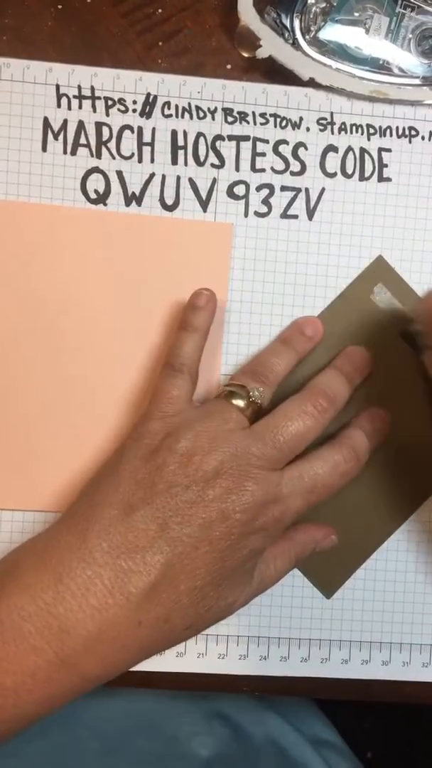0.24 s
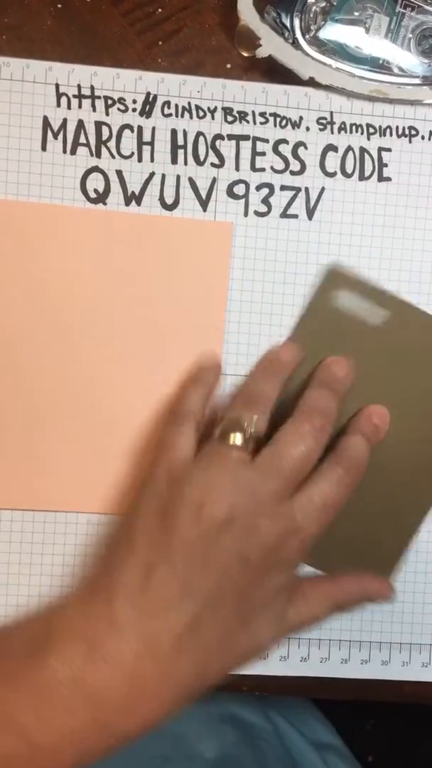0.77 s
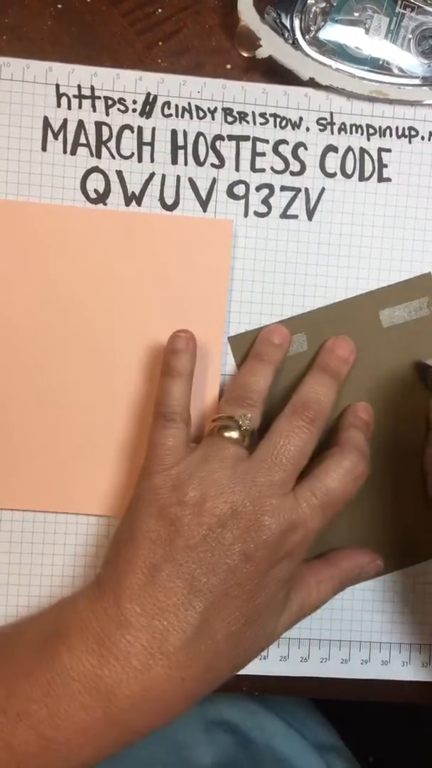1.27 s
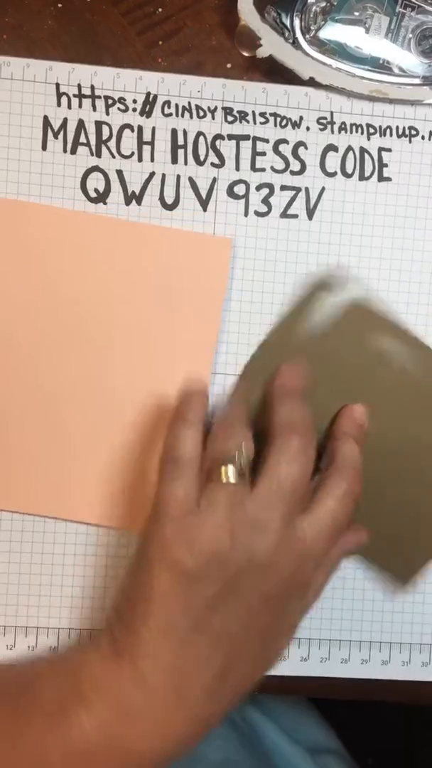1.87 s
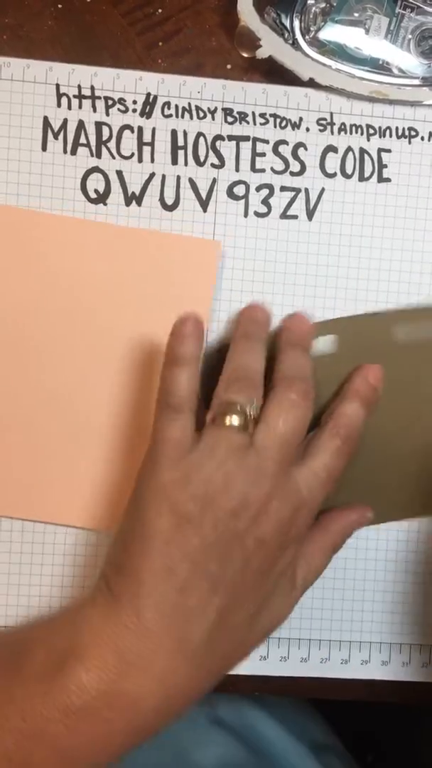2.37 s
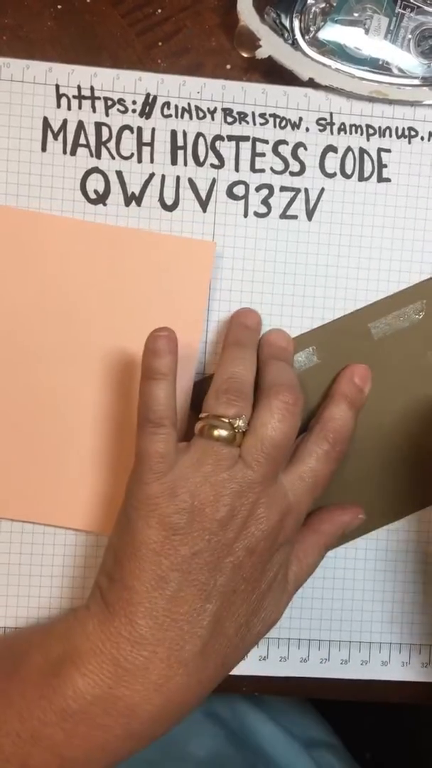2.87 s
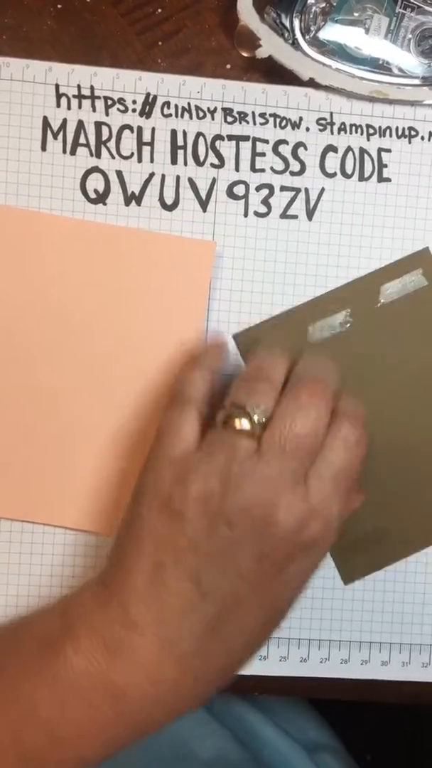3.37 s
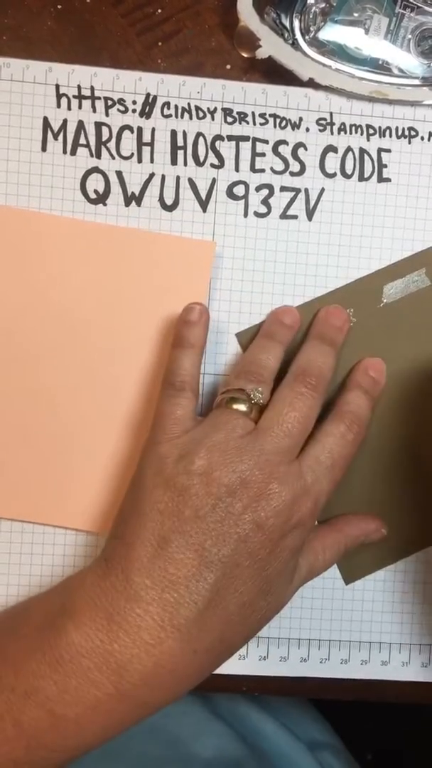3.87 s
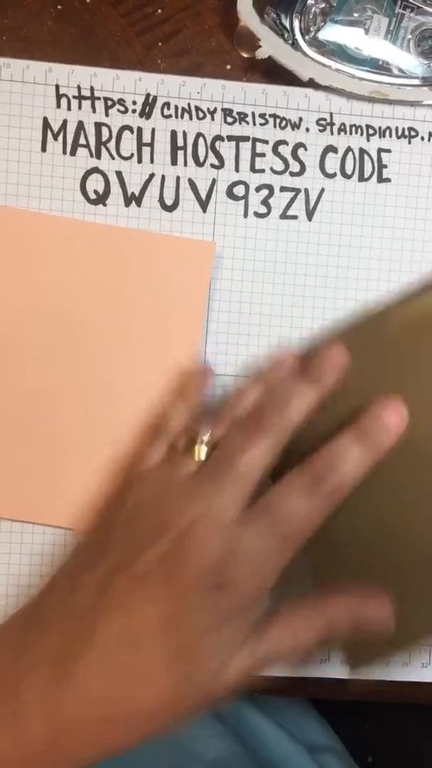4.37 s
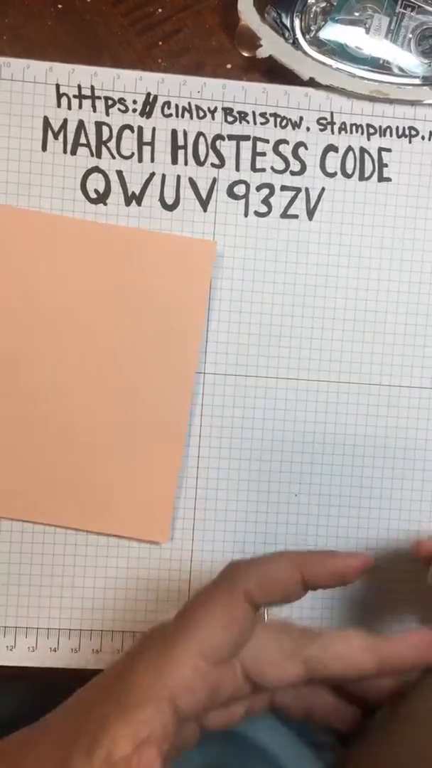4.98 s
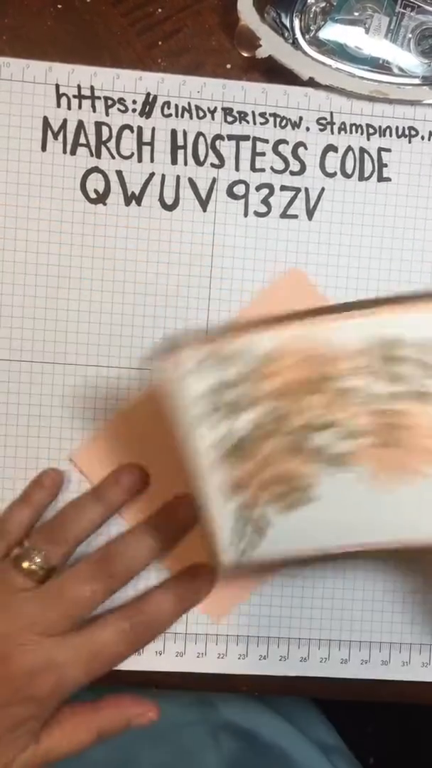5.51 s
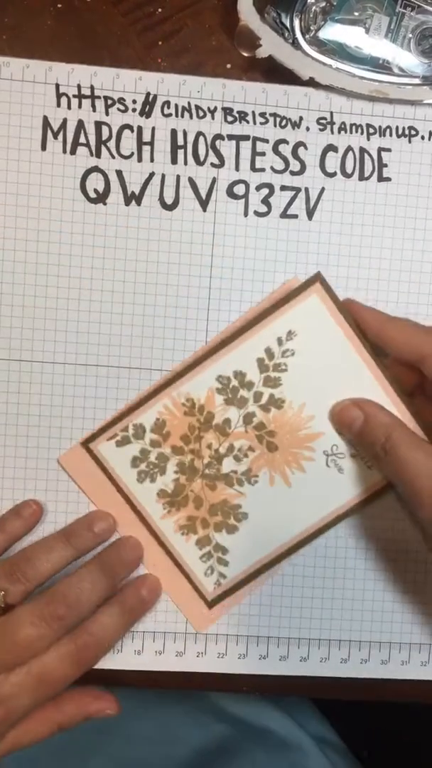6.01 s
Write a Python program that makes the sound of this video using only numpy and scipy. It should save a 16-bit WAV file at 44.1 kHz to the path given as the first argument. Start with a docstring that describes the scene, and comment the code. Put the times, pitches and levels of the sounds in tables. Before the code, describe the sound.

A plastic tape runner is drawn across cardstock in eight short strokes, mostly in pairs, each a quick ratcheting zip with a fine sticky crackle. Between them the card is turned and tapped on a desk pad. The runner then clatters down and rocks briefly, something knocks on the desk, and card slides softly into place. It is all close to the microphone in a small, quiet room.

```python
"""A plastic tape runner is drawn over cardstock in eight short strokes, close to one microphone at a
craft desk in a small room. Its pawl snaps off some 75 teeth a second and rings the hollow case while
the glue crackles off the tape; between strokes a hand turns and taps the card on the desk pad.
Then the runner is put down and rocks, something knocks on the desk, and the card slides into place."""
import sys
import numpy as np
from scipy import signal
from scipy.fft import rfft, irfft
from scipy.io import wavfile
from scipy.ndimage import uniform_filter1d

SR = 44100
rng = np.random.default_rng(int(sys.argv[2]) if len(sys.argv) > 2 else 0)


def to_wav(s):
    """Save 16-bit WAV."""
    ch = np.atleast_2d(s).T  # columns
    pcm = np.round(np.clip(ch, -1, 1) * 32767)  # PCM
    wavfile.write(sys.argv[1], SR, pcm.astype(np.int16))


N = 275625
TIME = np.arange(N) / SR
RING_SIZE = 4096  # FFT length for one contact
RING_HZ = np.fft.rfftfreq(RING_SIZE, 1 / SR)
CUTOFF_HZ = 16600
SNAP_HZ, SLIP_HZ = 8750, 1430  # the pawl's snap; the case's ring when the wheel slips

# Levels in all tables are relative.
# Strokes of the runner: (first click [s], last click [s], teeth [count], slow start [share of a gap],
# slow finish [share of a gap], contact length [s], case ring [Hz], case [dB], shell [dB], snap [dB],
# snap fade over the stroke [dB], peel [dB])
STROKES = [(0.1515, 0.2768, 9, 0.0093, 1, 0.0014, 1350, -37, -34, -34, 1.5, -42),
           (0.5463, 0.6465, 8, 1.15, 0.74, .0014, 1680, -38, -31.5, -31, 3.5, -43),
           (1.3376, 1.4274, 8, 1.08, 0.36, 0.0012, 1390, -39, -35.5, -34.5, -4.5, -40),
           (1.6486, 1.7663, 10, 1.4, 0.31, 0.00089, 1555, -38.5, -34.5, -30.5, 9, -41.5),
           (2.768, 2.8369, 6, .12, 0.77, .0012, 1750, -38, -32, -34, -8, -41.5),
           (3.0053, 3.1043, 8, .77, .83, .0014, 1740, -36.5, -32.5, -32.5, 5, -40.5),
           (3.8465, 3.8936, 5, 0.67, 0.35, .0011, 1380, -41.5, -36.5, -33.5, 4, -38.5),
           (4.0912, 4.1286, 4, 0.96, 0.35, 0.00084, 1680, -37.5, -36, -31, -1, -38)]
# Resonances of the runner's shell: (frequency [Hz], width [Hz], level [dB])
SHELL_MODES = [(2502, 220, 6.5), (3386, 320, -1.5), (3430, 90, -3), (4440, 970, -9.5), (4830, 510, -3.5),
               (6240, 600, 2), (6950, 380, 4.5)]
# Resonances of the desk under its pad: (frequency [Hz], width [Hz], level [dB])
PAD_MODES = [(170, 38, -8.5), (246, 39, -9.5), (390, 54, 0), (530, 35, -3), (1120, 320, -2),
             (2030, 800, -7.5), (3080, 250, -1.5), (5950, 4300, -8), (9700, 3500, -4.5)]


def from_db(db):
    """Decibels to gain."""
    return 10 ** (np.asarray(db) / 20)


def rms_one(x):
    """Scale to unit rms."""
    return x / np.sqrt(np.mean(x ** 2) + 1e-20)


def band(x, low_hz, high_hz):
    """Causal band-pass."""
    sos = signal.butter(2, [low_hz, min(high_hz, .48 * SR)], "band", fs=SR, output="sos")
    return signal.sosfilt(sos, x)


def held(start, end, fade):
    """A gate that opens at start and shuts at end."""
    return np.clip(.5 + np.minimum(TIME - start, end - TIME) / (2 * fade), 0, 1)


def swell(peak, rise, fall):
    """A push gathers speed and comes to rest, as a lopsided bell."""
    width = np.where(TIME < peak, rise, fall)
    return np.exp(-np.minimum(((TIME - peak) / width) ** 2, 30))


def friction(per_s, spread_db):
    """Tiny slips at random moments and of uneven size."""
    sizes = from_db(spread_db * np.minimum(rng.exponential(1, N), 4))
    return rng.standard_normal(N) * sizes * (rng.random(N) < per_s / SR)


def coloured(x, spectrum):
    """Give a steady excitation a spectrum, at unit rms."""
    hz, db = np.transpose(spectrum)
    bins = np.maximum(np.fft.rfftfreq(N, 1 / SR), 1)
    gains = from_db(np.interp(np.log(bins), np.log(hz), db))
    return rms_one(irfft(rfft(x) * gains, N))


def resonate(x, modes):
    """Drive parallel resonances of alternating sign."""
    out = 0
    for k, (hz, width, db) in enumerate(modes):
        r = np.exp(-np.pi * width / SR)
        poles = [1, -2 * r * np.cos(2 * np.pi * hz / SR), r * r]
        out = out + (-1) ** k * from_db(db) * (1 - r * r) / 2 * signal.lfilter([1, 0, -1], poles, x)
    return out


def resonance(hz, width_hz):
    """Frequency response of one damped mode, gain 1 at its peak."""
    return 1j * RING_HZ * width_hz / (hz ** 2 - RING_HZ ** 2 + 1j * RING_HZ * width_hz)


def body(modes, offsets_db=0):
    """Frequency response of parallel modes of alternating sign, offset per contact and mode."""
    offsets = np.transpose(offsets_db + np.zeros((1, len(modes))))
    return sum((-1) ** k * from_db(db + offsets[k][:, None]) * resonance(hz, width)
               for k, (hz, width, db) in enumerate(modes))


def touched(modes, times, spread_db):
    """Grip and point of contact change, so every contact wakes the modes in a new mix."""
    return body(modes, spread_db * rng.standard_normal((len(times), len(modes))))


def rebounds(lengths, first_hit=1.0, bounce=0.55, count=4):
    """Force spectrum of each contact: a first hit, then rebounds that spread it out in time."""
    gaps, sides = rng.uniform(.3, 1, (len(lengths), 2, count)).transpose(1, 2, 0)
    gaps = gaps / gaps.sum(axis=0) * np.abs(lengths)
    force = 1
    for gap, side in zip(gaps, sides):
        delay = np.exp(-2j * np.pi * RING_HZ * gap[:, None])
        reflection = bounce * np.sign(side - .65)[:, None]
        force = force * (delay - reflection) / (1 - reflection * delay)  # all-pass
    return first_hit + force


def strike(times, levels_db, spectra, low_hz, high_hz):
    """Sound one band of each contact at its level, its energy counted as rms over 8 ms."""
    rings = band(irfft(spectra, RING_SIZE)[:, :RING_SIZE // 2], low_hz, high_hz)
    strength = np.sqrt(np.sum(rings ** 2, axis=1) / (.008 * SR))
    out = np.zeros(N + RING_SIZE)
    for time, ring, gain in zip(times, rings, from_db(levels_db) / strength):
        start = int(time * SR)
        out[start:start + len(ring)] += gain * ring
    return out[:N]


def contacts(times, levels_db, lengths, modes, spread_db=3.0, first_hit=1.0):
    """Blows on one body, in four registers; the highest speaks first."""
    # Thud, ring, shell and snap: (low edge [Hz], high edge [Hz], delay [s], contact length [ratio])
    registers = [(110, 530, 0.00027, 1.39), (720, 3580, 0.00028, 1.196), (2220, 9500, .0002, 1.26),
                 (6880, 12100, 0.000071, 1.3)]
    response = touched(modes, times, spread_db)
    return sum(strike(times + delay, db, rebounds(lengths * stretch, first_hit) * response, low, high)
               for db, (low, high, delay, stretch) in zip(levels_db, registers))


def slides(rub_trim_db=-2.5, hiss_trim_db=-3.05, lowest_hz=170):
    """Paper fibres catch on each other: a soft rub from the sheet, a bright hiss from its surface."""
    # Pushes of card over the pad: (fastest moment [s], rise [s], fall [s], rub [dB], hiss [dB])
    pushes = [(0.02, .06, .08, -62, -73), (0.76, 0.056, 0.073, -63.5, -57.5),
              (0.866, 0.046, 0.034, -59, -47.5), (0.93, 0.038, 0.084, -67, -75),
              (1.83, 0.07, 0.056, -58, -55.5), (1.93, 0.055, .045, -59.5, -45),
              (2.06, 0.037, 0.03, -57.5, -56.5), (2.35, 0.074, 0.053, -63, -54),
              (2.425, 0.042, 0.049, -59, -55), (3.17, 0.091, 0.067, -59.5, -51),
              (3.255, 0.044, 0.084, -62, -50.5), (3.278, 0.017, .018, -52, -64),
              (4.26, 0.044, 0.029, -65, -62.5), (5.2, 0.26, 0.12, -57.5, -67),
              (5.3, 0.031, 0.02, -66, -56.5), (5.44, 0.071, 0.066, -55, -40.5),
              (5.56, 0.089, 0.13, -72, -65), (5.8, 0.13, 0.1, -68, -58.5),
              (6.145, 0.044, 0.016, -79, -61.5)]
    # Spectrum of the rubbing sheet: (frequency [Hz], level [dB])
    rub_spectrum = [(150, 1), (250, -2.5), (367, 5.5), (436, -3.5), (513, 3), (826, -8), (971, 1.5),
                    (2060, -2.5), (3250, 1), (4000, -22), (5200, -9.5), (8800, -120)]
    # Spectrum of the surface hiss: (frequency [Hz], level [dB])
    hiss_spectrum = [(2350, -17), (4000, -8), (6060, -0.5), (6580, 0.5), (11000, 2.5), (13700, -11),
                     (15800, -7), (16200, -47), (16500, -47)]
    rub_gain, hiss_gain = sum(from_db(levels_db)[:, None] * swell(peak, rise, fall)
                              for peak, rise, fall, *levels_db in pushes)
    fibres = friction(per_s=30000, spread_db=2.4)
    rub = from_db(rub_trim_db) * rub_gain * coloured(fibres, rub_spectrum)
    hiss = from_db(hiss_trim_db) * hiss_gain * coloured(fibres, hiss_spectrum)
    return band(rub + hiss, lowest_hz, CUTOFF_HZ)


def creaks(width_hz=220, shell_db=-13, fade_s=0.0023):
    """The loaded wheel sticks and slips before it turns, and the case rings along."""
    # The tip is pressed down: (start [s], end [s], level [dB])
    presses = [(0.102, 0.15, -48.5), (2.693, 2.756, -47.5), (3.793, 3.842, -57)]
    pressure = sum(from_db(db) * held(start, end, fade_s) for start, end, db in presses)
    slips = friction(per_s=2500, spread_db=1.0) + 1e-18
    case = rms_one(band(resonate(slips, [(SLIP_HZ, width_hz, 0)]), 700, 5100))
    shell = from_db(shell_db) * rms_one(resonate(slips, SHELL_MODES))
    return pressure * (case + shell)


def tooth_times(first, last, teeth, slow_start, slow_finish, start_teeth=1.15, finish_teeth=1.2):
    """The wheel gets up to speed within a tooth or two and slows again at the end of the stroke."""
    k = np.arange(round(teeth) - 1)
    gaps = 1 + slow_start * np.exp(-k / start_teeth) + slow_finish * np.exp(-k[::-1] / finish_teeth)
    return first + (last - first) * np.append(0, np.cumsum(gaps)) / gaps.sum()


def stroke_clicks(stroke, case_db_per_doubling=3, snap_db_per_doubling=2.5, case_fade_db=2.5,
                  lengthening=0.607, pitch_scatter=0.051, case_scatter_db=3.5, snap_scatter_db=2.46):
    """One row a tooth: a faster wheel clicks louder, and no two clicks are alike."""
    times = tooth_times(*stroke[:5])
    length, case_hz, case_db, shell_db, snap_db, snap_fade_db = stroke[5:-1]
    speed = -np.log2(np.gradient(times))
    speed -= speed.mean()
    # Along the stroke the tip presses harder: contacts lengthen and the case rings less.
    along = np.linspace(-.5, .5, len(times))
    lengths = length * np.exp(lengthening * along)
    chance = rng.standard_normal((len(times), 4)).T
    case_hz *= np.exp(pitch_scatter * chance[0])
    case_db += case_db_per_doubling * speed - case_fade_db * along + case_scatter_db * chance[1]
    snap_hz = SNAP_HZ * np.exp(pitch_scatter * chance[2])
    snap_db += snap_db_per_doubling * speed - snap_fade_db * along + snap_scatter_db * chance[3]
    shell_db = np.full(len(times), shell_db)
    return np.transpose([times, lengths, case_hz, case_db, shell_db, snap_hz, snap_db])


def pawl_clicks():
    """Every tooth of every stroke, and single teeth slipping outside the strokes."""
    # Single slips: (time [s], contact length [s], case [dB], shell [dB], snap [dB])
    slips = [(0.1117, 0.0045, -39, -55, -61), (2.7066, 0.0026, -39, -49, -59),
             (2.737, 0.00074, -34.5, -41, -46), (3.8238, 0.00093, -39.5, -47.5, -51.7),
             (3.9078, 0.0016, -44, -55, -48)]
    singles = [(time, length, SLIP_HZ, case_db, shell_db, SNAP_HZ, snap_db)
               for time, length, case_db, shell_db, snap_db in slips]
    return np.vstack([stroke_clicks(stroke) for stroke in STROKES] + [singles])


def ratchet(case_trim_db=-1.37, shell_trim_db=-0.6, snap_trim_db=-0.5, desk_trim_db=-24,
            pawl_trim_db=-15, pawl_scatter_db=3):
    """The pawl drops off each tooth with a bright snap, then the hollow case rings."""
    # Resonances of the snap: (frequency [Hz], width [Hz], level [dB])
    snap_modes = [(7800, 2400, 3.5), (11200, 1300, -21)]
    # The case's lowest, faint ring: (frequency [Hz], width [Hz], level [dB])
    case_modes = [(884, 37, -6.5)]
    times, lengths, case_hz, case_db, shell_db, snap_hz, snap_db = pawl_clicks().T
    tooth = rebounds(lengths) * (resonance(snap_hz[:, None], width_hz=1200) + body(snap_modes))
    snap = strike(times + .0003, snap_db + snap_trim_db, tooth, 8280, 11950)
    walls = rebounds(lengths * 1.087, first_hit=0.71) * touched(SHELL_MODES, times, spread_db=4.0)
    shell = strike(times + .0003, shell_db + shell_trim_db, walls, 3300, 5950)
    case_response = resonance(case_hz[:, None], width_hz=300) + body(case_modes)
    hollow = rebounds(lengths * 0.632, first_hit=0.91) * case_response
    case = strike(times + .00055, case_db + case_trim_db, hollow, 1130, 2150)
    spring = rebounds(lengths) * resonance(hz=14600, width_hz=1000)  # the pawl's own short ring
    spring_db = snap_db + pawl_trim_db + pawl_scatter_db * rng.standard_normal(len(times))
    pawl = strike(times + .0006, spring_db, spring, 13000, 17000)
    # A little of each click reaches the desk through the tip.
    desk = strike(times, case_db + desk_trim_db, rebounds(lengths) * body(PAD_MODES), 133, 390)
    return snap + pawl + shell + case + desk


def peel(lag_s=0.0023, overrun_s=0.017, fade_s=0.014, slack_db=4, tighten_s=.025):
    """Threads of glue part in a fine crackle while the runner moves, louder as the tape tightens."""
    # Spectrum of the peeling tape: (frequency [Hz], level [dB])
    spectrum = [(120, -64), (200, 1), (312, -35.5), (403, 1.5), (702, -6), (1500, 9), (2250, 7),
                (3250, 6.5), (3980, 1), (7880, 5.5), (8810, -41), (9840, 5.5), (12700, 0), (15300, -23),
                (16500, -26)]
    pull = 0
    for first, last, *_, db in STROKES:
        slack = np.exp(-np.clip((TIME - first) / tighten_s, 0, 10))
        pull = pull + from_db(db - slack_db * slack) * held(first + lag_s, last + overrun_s, fade_s)
    return pull * coloured(friction(per_s=6000, spread_db=0.0), spectrum)


def taps(contact_s=.0022, trim_db=1.27, snap_trim_db=-3.5):
    """The runner's tip, fingers and card edges touch down lightly, damped by the paper pad."""
    # Touches on the pad: (time [s], thud [dB], ring [dB], tick [dB])
    touches = [(0.4818, -57.5, -53, -67), (0.922, -59, -70, -74), (1.0238, -60, -59, -55.5),
               (1.1689, -61.5, -60.5, -61.5), (1.253, -62, -66, -90), (1.602, -52, -55.5, -69),
               (1.9312, -55.5, -50, -57), (1.9721, -50, -59, -73), (2.0863, -55.5, -70, -69),
               (2.2713, -61.5, -57.5, -60.5), (2.388, -57.5, -61, -70), (2.6807, -57, -59, -72),
               (2.968, -42.5, -42, -47.5), (3.516, -62, -58, -58.5), (3.7769, -56.5, -61, -78),
               (3.7935, -66, -53.5, -59), (4.0485, -41, -34.5, -34), (4.315, -81, -64.5, -58.5),
               (5.206, -76, -58.5, -61), (5.3481, -61, -47.5, -51), (5.362, -47, -58, -50),
               (5.577, -61, -49, -54), (5.813, -59, -62.5, -75)]
    times, thud_db, ring_db, tick_db = np.transpose(touches)
    levels_db = thud_db, ring_db, tick_db, tick_db + snap_trim_db
    return from_db(trim_db) * contacts(times, levels_db, np.full(len(times), contact_s), PAD_MODES)


def knocks(trim_db=-0.6):
    """The runner is put down: the desk top thuds and the plastic clacks."""
    # Landings: (time [s], thud [dB], case ring [dB], shell [dB], snap [dB], contact length [s])
    landings = [(4.487, -44, -30, -26.5, -24.5, 0.0018), (4.5482, -31.5, -22, -32, -46, 0.0017),
                (4.5544, -57, -36, -33, -33, 0.0029), (4.6446, -46.5, -45, -33, -37.5, 0.00099),
                (4.6536, -55, -40.5, -53, -44, 0.0016), (4.7294, -55, -37.0, -36, -47.5, 0.0014),
                (4.892, -54, -51, -68, -72, 0.003)]
    # Resonances of runner and desk together: (frequency [Hz], width [Hz], level [dB])
    modes = [(183, 130, -16.5), (298, 126, -15.5), (382, 55, -1.5), (560, 330, -13), (836, 160, -11.5),
             (1156, 223, -3), (1359, 80, 5), (1520, 390, -12.5), (1650, 110, 1.5), (2290, 1050, -12),
             (3190, 350, -6), (4100, 700, -17.5), (4970, 1000, -14), (6200, 2000, -19.5),
             (8860, 2300, -18.5), (11700, 790, -18.5), (14500, 970, -26)]
    times, *levels_db, lengths = np.transpose(landings)
    return from_db(trim_db) * contacts(times, levels_db, lengths, modes, spread_db=2.0, first_hit=0.95)


def levelled(x, window=2600):
    """Hold the running rms at 1."""
    return x / np.sqrt(np.abs(uniform_filter1d(x ** 2, size=window)) + 1e-14)


def rocking(start_s=4.625, attack_s=0.039, bumps_per_s=38, unevenness=.35, glide_per_s=0.208,
            boom_db=-49.5, boom_end_s=4.85, boom_release_db_per_s=195,
            ring_db=-51, ring_end_s=4.835, ring_release_db_per_s=550, ring_sag_db_per_s=30):
    """The runner rocks: quick soft bumps keep the desk booming and the case ringing until it settles."""
    # The desk top's boom: (frequency [Hz], width [Hz], level [dB])
    boom_modes = [(329.4, 15, -1.5), (349, 13, 2), (387, 32, 1.5)]
    # The rattling case: (frequency [Hz], width [Hz], level [dB])
    rattle_modes = [(816, 32, -3), (1033, 15, 11), (1080, 48, -18), (1290, 470, -5)]
    age = np.maximum(TIME - start_s, 0)
    attack = np.minimum(age / attack_s, 1)
    boom_fall_db = boom_release_db_per_s * np.maximum(TIME - boom_end_s, 0)
    ring_fall_db = ring_sag_db_per_s * age + ring_release_db_per_s * np.maximum(TIME - ring_end_s, 0)
    gaps = np.abs(1 + unevenness * rng.standard_normal(400)) * SR / bumps_per_s
    bumps = np.bincount(np.cumsum(gaps).astype(int), minlength=N)[:N] + 1e-18
    quickening = TIME + glide_per_s / 2 * (TIME - ring_end_s) ** 2  # the boom rises a little in pitch
    boom = levelled(np.interp(quickening, TIME, band(resonate(bumps, boom_modes), 220, 680)))
    ring = levelled(band(resonate(bumps, rattle_modes), 760, 1560))
    return attack * (from_db(boom_db - boom_fall_db) * boom + from_db(ring_db - ring_fall_db) * ring)


def desk_blow(trim_db=2.4):
    """One square, hard hit with hardly any rebound wakes the whole desk top."""
    # The hit: (time [s], thud [dB], ring [dB], shell [dB], snap [dB], contact length [s])
    blow = [(5.0382, -31, -26, -33.5, -29, 0.00116)]
    # Resonances of the desk top: (frequency [Hz], width [Hz], level [dB])
    modes = [(50, 50, -39), (157, 27, -1.5), (233, 57, -1), (337, 44, 2), (527, 31, -1.5), (680, 80, -6),
             (890, 110, -9), (1095, 114, -1), (1930, 190, -9), (2260, 230, -10), (3250, 430, -5),
             (4670, 480, -6.5), (6060, 3400, -12.5), (8400, 1800, -7), (12000, 4700, -14.5)]
    times, *levels_db, lengths = np.transpose(blow)
    return from_db(trim_db) * contacts(times, levels_db, lengths, modes, spread_db=0.0, first_hit=2.7)


def brush(level_db=-58, low_hz=2000, high_hz=3600):
    """Skin brushes over paper as the hand reaches for the card: a smooth, narrow rub."""
    rub = rms_one(band(friction(per_s=30000, spread_db=1.0), low_hz, high_hz))
    return from_db(level_db) * swell(peak=5.446, rise=0.2, fall=0.15) * rub


def room(x, first_echo_s=0.0021, tail_samples=18000, bands=9):
    """Desk and near walls return a short, dense tail to the microphone."""
    # Reverberation of the small room: (frequency [Hz], time to fall 60 dB [s], level [dB])
    reverberation = [(180, 0.11, -6.5), (495, 0.25, -8), (1420, 0.17, -7.5), (3700, 0.2, -7.5),
                     (9500, 0.16, -13), (15000, 0.2, -8.5)]
    hz, t60, db = np.transpose(reverberation)
    age = np.arange(tail_samples) / SR
    onset = np.clip(age / first_echo_s - 1, 0, 1)
    edges = np.geomspace(90, 18000, bands + 1)
    response = 0
    for low, high in zip(edges, edges[1:]):
        log_centre = np.log(low * high) / 2
        fall = from_db(-60 * age / np.interp(log_centre, np.log(hz), t60))
        tail = band(rng.standard_normal(tail_samples) * fall * onset, low, high)
        share = np.sqrt(2 * (high - low) / SR / np.sum(tail ** 2))
        response = response + tail * share * from_db(np.interp(log_centre, np.log(hz), db))
    return signal.fftconvolve(x, response)[:N]


def room_tone(level_db=-66.5):
    """The faint, steady noise of the room at the microphone."""
    # Spectrum of the quiet room: (frequency [Hz], level [dB])
    spectrum = [(15, -4), (25, -22), (49, -60), (111, 4), (252, 5), (410, -0.5), (496, -0.5), (1180, -5),
                (1930, -5.5), (2150, -8), (2900, -6.5), (3910, -9.5), (11900, -9.5), (15200, -24),
                (16500, -17)]
    return from_db(level_db) * coloured(rng.standard_normal(N), spectrum)


def scene(clatter_send_db=4.0, blow_send_db=0.5):
    """The desk up close and the room behind it reach one microphone, the same in both channels."""
    runner = ratchet() + creaks() + peel()
    clatter = knocks() + rocking()
    blow = desk_blow()
    paper = taps() + slides() + brush()
    echo = room(runner + from_db(clatter_send_db) * clatter + from_db(blow_send_db) * blow + paper)
    return np.tile(runner + clatter + blow + paper + echo + room_tone(), (2, 1))


def record(dry, low_cut_hz=35):
    """The microphone thins the deep bass; the highest treble is cut steeply."""
    thin = signal.sosfilt(signal.butter(1, low_cut_hz, "high", fs=SR, output="sos"), dry)
    return signal.sosfilt(signal.ellip(10, .2, 80, CUTOFF_HZ, fs=SR, output="sos"), thin)


dry = scene()
out = record(dry)
to_wav(out)
```